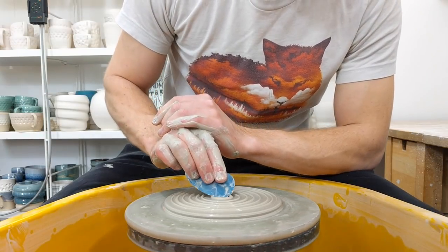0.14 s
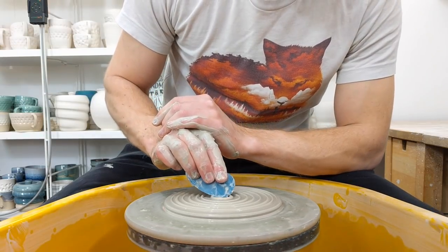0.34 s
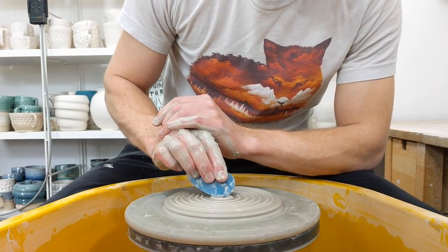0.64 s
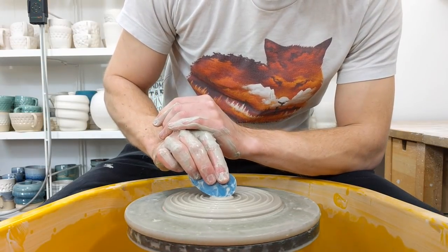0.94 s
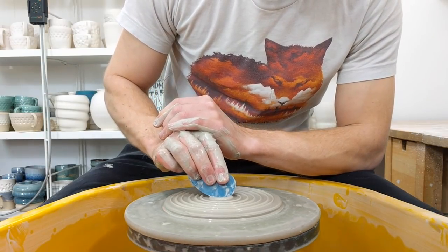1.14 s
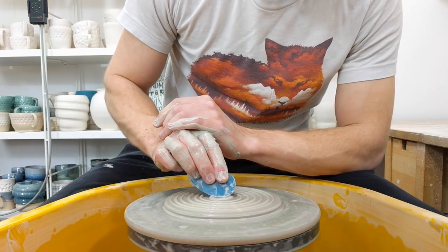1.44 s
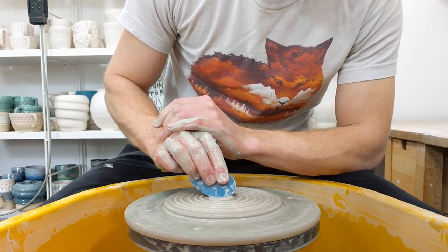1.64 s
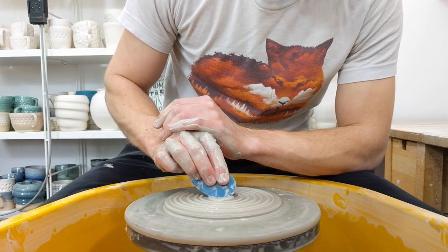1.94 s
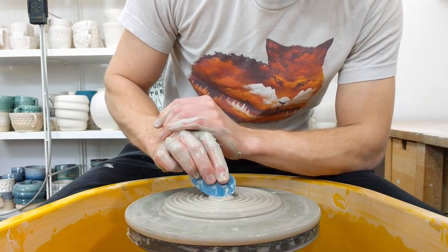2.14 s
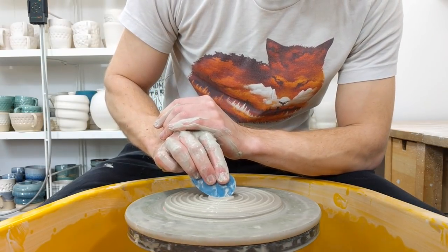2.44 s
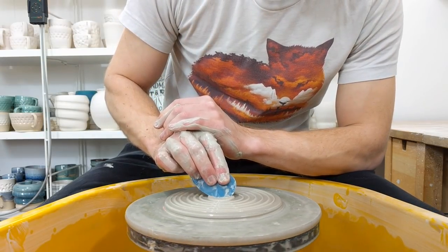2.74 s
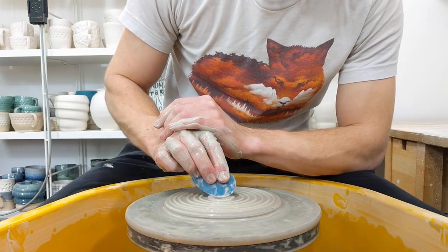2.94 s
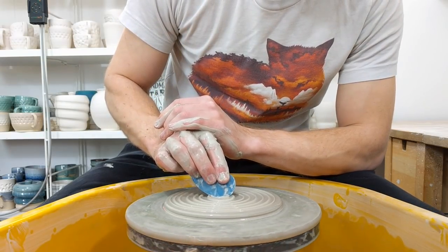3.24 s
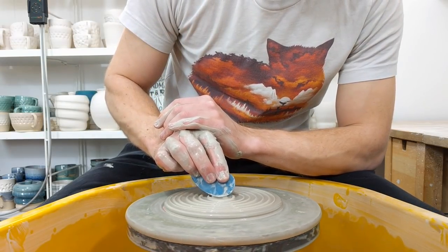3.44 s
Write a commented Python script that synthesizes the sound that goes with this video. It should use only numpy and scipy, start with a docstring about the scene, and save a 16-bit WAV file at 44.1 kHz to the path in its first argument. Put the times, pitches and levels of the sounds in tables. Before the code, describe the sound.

Steady electric hum of a spinning pottery wheel, a tool softly scraping the clay.

```python
"""Pottery wheel in a quiet workshop.

The motor hums and buzzes at twice the mains rate, over a low throb from the spinning drive
that sags near the end. A tool held on the wet clay hisses softly, with a few gritty scrapes
and a small wet tick. Palms rub dully on the clay over steady room air."""
import sys
import numpy as np
from scipy import signal
from scipy.fft import rfft, irfft
from scipy.io import wavfile

SR = 44100
rng = np.random.default_rng(int(sys.argv[2]) if len(sys.argv) > 2 else 0)


def master(y):
    """Save y as 16-bit WAV."""
    cut = np.clip(np.atleast_2d(y).T, -1, 1)
    pcm = np.round(cut * 32767)  # scale
    wavfile.write(sys.argv[1], SR, pcm.astype(np.int16))


N = 158760  # 3.6 s
TIME_S, BIN_HZ = np.arange(N) / SR, np.fft.rfftfreq(N, 1 / SR)


def amp(db):
    """Decibels to gain."""
    return 10 ** (np.asarray(db) / 20)


def unit(x):
    """Scale to rms 1."""
    return x / np.sqrt(np.mean(abs(x) ** 2) + 1e-30)


def curve(rows):
    """A (time, value) table at every sample."""
    times_s, values = np.transpose(rows)
    return np.interp(TIME_S, times_s, values)


def colour(x, spectrum):
    """Filter x by a (frequency, gain) table; rms 1."""
    hz, db = np.transpose(spectrum)
    gain_db = np.interp(np.log(BIN_HZ + 1), np.log(hz), db)
    return unit(irfft(rfft(x) * amp(gain_db), N))


def drift(rate_hz):
    """Slow random wander, rms 1."""
    noise = rfft(rng.standard_normal(N)) * (BIN_HZ > 0)
    return unit(irfft(noise / (1 + (BIN_HZ / rate_hz) ** 2), N))


# Motor hum and casing buzz: (harmonic [-], level before swell [dB re HUM_DB])
HUM_PARTIALS = [(1, 0), (2, -2), (3, -5), (4, -13), (5, -32.5), (6, -16.5), (7, -14.5), (8, -20), (9, -36)]
BUZZ_PARTIALS = [(11, -39), (12, -37.5), (13, -44.5), (14, -26.5), (15, -30.5), (16, -24), (17, -27),
                 (18, -39), (19, -31), (20, -36), (21, -33.5), (23, -40), (24, -46), (25, -41.5),
                 (27, -49.5), (28, -39)]
# Swell of harmonics 1-3, 4, 5 and 6-8: (time [s], gain [dB])
LOW_SWELL = [(0, 0.5), (.6, -0.5), (1.3, -0.7), (1.75, -1.4), (2.1, 0.2), (2.5, 0), (2.85, 0.7), (3.6, 0.2)]
FOURTH_SWELL = [(0, -5.5), (.25, 4.5), (.65, -4.5), (.8, 2.5), (1.02, 1), (1.28, -7.5), (1.42, 1),
                (1.6, 2.5), (1.85, -6.5), (2.1, 0.5), (2.3, 1.5), (2.45, -5), (2.65, 0.5), (2.95, -0.5),
                (3.15, -2.5), (3.4, 1), (3.6, -1)]
FIFTH_SWELL = [(0, 13), (.2, 11), (.5, 2), (1, -1), (2.2, 1.5), (3.6, -8)]
UPPER_SWELL = [(0, 2), (.5, 1.5), (.9, 0.5), (1.6, .2), (2, -0.5), (2.7, -.8), (3.6, -0.7)]
# Resonances, phase only; negative width marks a notch: (frequency [Hz], width [Hz])
FRAME_MODES = [(350, 35), (500, -65), (600, 254)]
CASING_MODES = [(1530, 68)]
HUM_HZ, HUM_DB = 99.88, -47.6
FIRST_PULL_S, BUZZ_LAG_S = .005, .0041
JITTER_S, JITTER_HZ, WAVER_HZ = 2.2e-5, 2.6, 10.4

def motor():
    """Each magnetic pull kicks the frame, then rattles the casing; partials above a resonance lag."""
    clock_s = TIME_S - FIRST_PULL_S + JITTER_S * drift(JITTER_HZ)
    low, upper = amp(curve(LOW_SWELL)), amp(curve(UPPER_SWELL))
    fourth, fifth = amp(curve(FOURTH_SWELL)), amp(curve(FIFTH_SWELL))
    swell = {1: low, 2: low, 3: low, 4: fourth, 5: fifth, 6: upper, 7: upper, 8: upper}
    parts = (HUM_PARTIALS, 0, FRAME_MODES), (BUZZ_PARTIALS, BUZZ_LAG_S, CASING_MODES)
    out = np.zeros(N)
    for partials, delay_s, modes in parts:
        for harmonic, db in partials:
            hz = harmonic * HUM_HZ
            lag_rad = sum(np.arctan2(hz * width_hz, mode_hz**2 - hz**2) for mode_hz, width_hz in modes)
            phase_rad = 2 * np.pi * hz * (clock_s - delay_s) - lag_rad
            depth = .0036 * amp(.51 * (db + 40.5))  # strong partials waver less in proportion
            waver = depth * (drift(WAVER_HZ) + 1j * drift(WAVER_HZ))
            envelope = amp(db) * swell.get(harmonic, 1) + waver
            out += (envelope * np.exp(1j * phase_rad)).imag
    return amp(HUM_DB) * np.sqrt(2) * out


# Drive speed: (time [s], rotation rate [Hz])
DRIVE_SPEED = [(0, 83.6), (1.8, 83.8), (2.95, 83.5), (3.03, 79), (3.12, 76.5), (3.2, 77.5), (3.45, 66),
               (3.6, 63)]
# Rotor throb: (time [s], level [dB])
ROTOR_LEVEL = [(0, -57), (1.7, -57), (2.05, -57), (2.2, -53), (2.35, -56), (2.95, -55), (3.07, -61),
               (3.13, -49), (3.19, -49), (3.25, -64), (3.45, -64), (3.6, -69)]
BELT_RATIO, BELT_DB, BELT_WAVER = .645, -71.5, .089

def drive():
    """The unbalanced rotor beats against the hum; the belt adds a weaker, lower tone."""
    turns = np.cumsum(curve(DRIVE_SPEED)) / SR
    rotor = amp(curve(ROTOR_LEVEL)) * np.sin(2 * np.pi * turns)
    belt_gain = amp(BELT_DB) * (1 + BELT_WAVER * drift(rate_hz=4.5))
    belt = belt_gain * np.sin(2 * np.pi * BELT_RATIO * turns)
    return np.sqrt(2) * (rotor + belt)


# Tool sliding on wet clay: (frequency [Hz], relative density [dB])
HISS_SPECTRUM = [(1500, -3), (2950, -13), (3200, -5), (3450, -12.5), (5000, -12.5), (5900, -2), (6700, 1.5),
                 (7500, -4), (8500, -9.5), (11000, -15), (15500, -26)]
# Hiss under changing tool pressure: (time [s], level [dB])
HISS_LEVEL = [(0, -63.5), (.1, -61), (.16, -67), (.35, -71), (.5, -72), (.75, -65.5), (.9, -71.5),
              (1.25, -65.5), (1.5, -70), (1.66, -66), (1.76, -66.5), (1.98, -64), (2.22, -72.5),
              (2.65, -66.5), (2.85, -68.5), (3.28, -65.5), (3.45, -67), (3.6, -64)]
GRIT_PER_S, GRIT_POWER_SHARE, FLICKER_DB = 1300, .22, 1.7

def clay_hiss():
    """Smooth sliding friction mixed with fine grit, following the pressure on the tool."""
    grit = rng.standard_normal(N) * (rng.random(N) < GRIT_PER_S / SR)
    grain_db = -.5 * np.minimum(rng.exponential(1, N), 4)
    grit = unit(grit * amp(grain_db))
    sliding = rng.standard_normal(N)
    friction = np.sqrt(GRIT_POWER_SHARE) * grit + np.sqrt(1 - GRIT_POWER_SHARE) * sliding
    level_db = curve(HISS_LEVEL) + FLICKER_DB * drift(rate_hz=14)
    return amp(level_db) * colour(friction, HISS_SPECTRUM)


# Tool and hand scrapes, rubs, ticks: (time [s], level [dB], centre [Hz], width [Hz], decay [s])
SCRAPES = [(0.067, -49, 7000, 1900, 0.0026), (0.095, -49, 7100, 2300, 0.0021),
           (.49, -63.5, 6330, 3800, 0.028), (0.749, -47.5, 2360, 600, .005), (1.14, -63, 760, 540, .04),
           (1.23, -67, 620, 620, 0.13), (1.374, -56, 5600, 6500, 0.031), (1.412, -63, 6960, 3800, .03),
           (1.665, -61.5, 6200, 3000, .015), (1.827, -54, 6700, 2300, 0.0027), (2.38, -64, 230, 190, .04),
           (3.12, -71, 2080, 140, 0.048), (3.2, -76.5, 3240, 110, .6)]

def scrapes(rise_s=.0007):
    """Grains and wet lumps catch on the tool: noise bursts that die away."""
    out = np.zeros(N)
    for start_s, db, centre_hz, width_hz, decay_s in SCRAPES:
        response = 1 / (1 + (2 * (BIN_HZ - centre_hz) / width_hz) ** 2) ** 2
        band = unit(irfft(rfft(rng.standard_normal(N)) * response, N))
        age_s = np.maximum(TIME_S - start_s, 0)
        envelope = np.minimum(age_s / rise_s, 1) * np.exp(-age_s / decay_s)
        out += amp(db) * band * envelope
    return out


def splash_pan(x, echoes=12, echo_db=-6, spread_s=.012):
    """The pan throws back close reflections; overall level is kept."""
    signs = rng.choice([-1., 1.], echoes)
    delays_s = .001 + spread_s * rng.random(echoes)
    taps = np.zeros(N)
    taps[(SR * delays_s).astype(int)] = signs
    taps *= amp(echo_db) / np.linalg.norm(taps)
    taps[0] = 1  # direct path
    return signal.fftconvolve(x, taps / np.linalg.norm(taps))[:N]


# Palm friction: (frequency [Hz], relative density [dB])
PALM_SPECTRUM = [(100, -27), (350, -3), (570, 0.5), (850, 3.5), (1200, -2.5), (2100, -14), (3500, -27),
                 (15500, -72)]

def palms(level_db=-73.5, swell_db=2):
    """Hands on the turning clay give a dull, uneven rub."""
    gain = amp(level_db + swell_db * drift(rate_hz=2.8))
    return gain * colour(rng.standard_normal(N), PALM_SPECTRUM)


# Room air and bearing rumble: (frequency [Hz], relative density [dB])
AIR_SPECTRUM = [(15, -9), (28, -9), (42, -15.5), (58, 3), (80, 0), (120, -4), (145, -11), (220, -14.5),
                (300, -14.5), (450, -21), (600, -15), (800, -24.5), (1100, -24.5), (1500, -22), (2000, -24),
                (2700, -24.5), (5000, -24.5), (8000, -27), (11000, -31), (15500, -29.5)]

def room_air(level_db=-59):
    """Steady rumble and hiss of the workshop."""
    return amp(level_db) * colour(rng.standard_normal(N), AIR_SPECTRUM)


def scene():
    """Wheel, room and clay at one microphone."""
    return (motor() + drive() + room_air() + palms() + splash_pan(clay_hiss()) + scrapes())[None]


def record(dry):
    """Low-pass at 15.8 kHz."""
    lowpass = signal.firwin(511, 15800, window=("kaiser", 9), fs=SR)
    return signal.oaconvolve(dry, lowpass[None], "same")


dry = scene()
out = record(dry)
master(out)
```